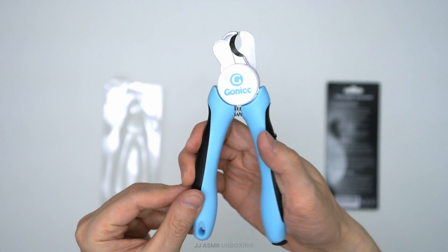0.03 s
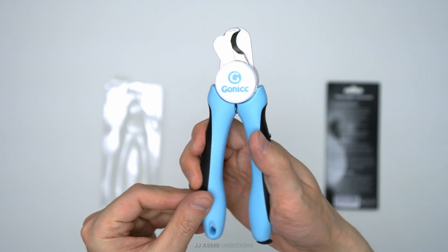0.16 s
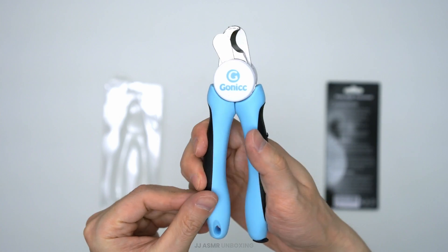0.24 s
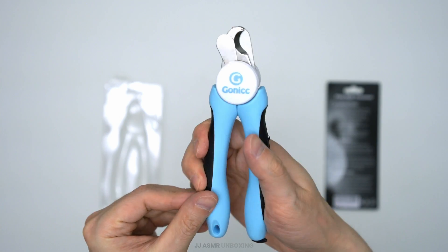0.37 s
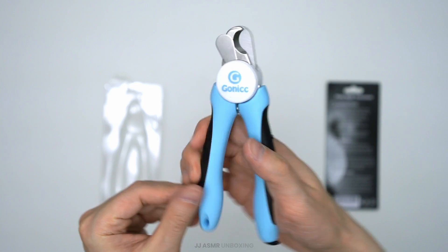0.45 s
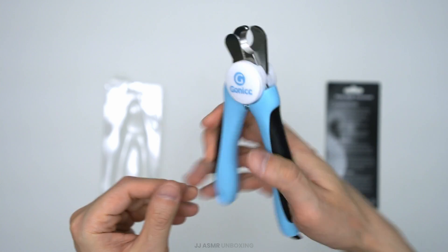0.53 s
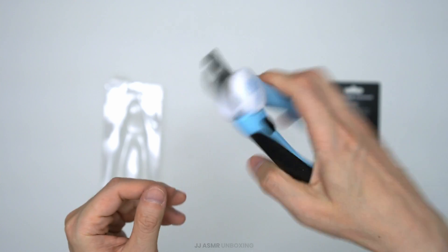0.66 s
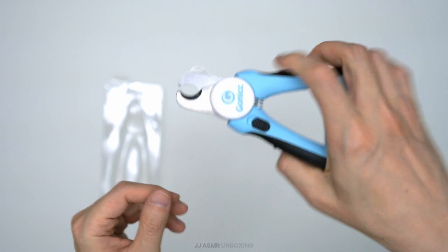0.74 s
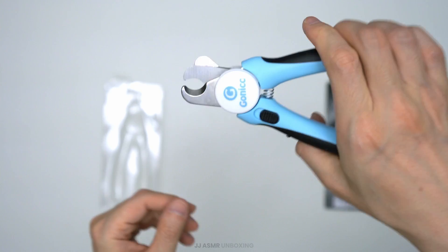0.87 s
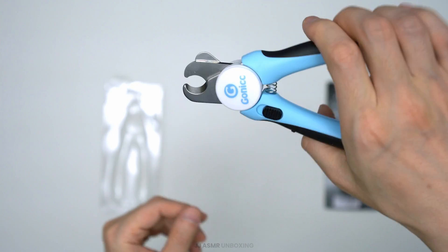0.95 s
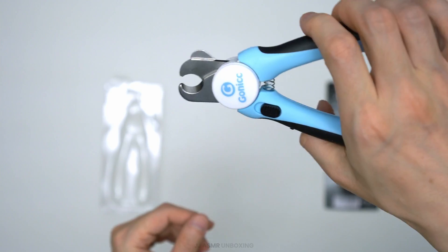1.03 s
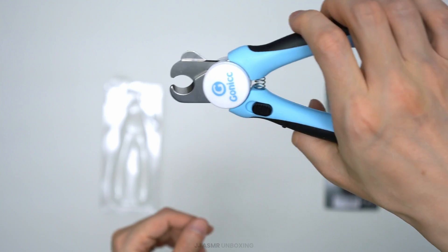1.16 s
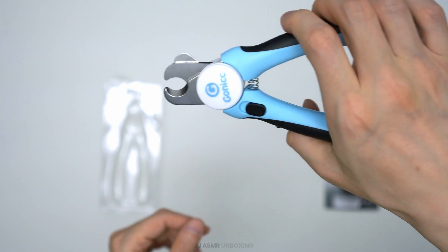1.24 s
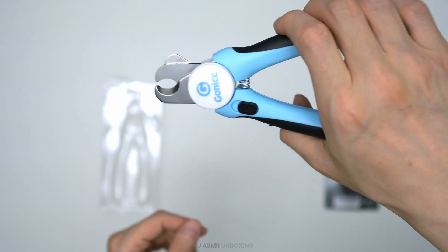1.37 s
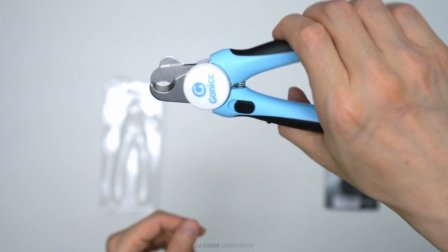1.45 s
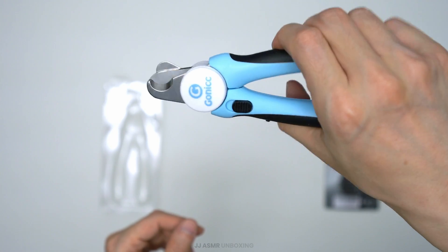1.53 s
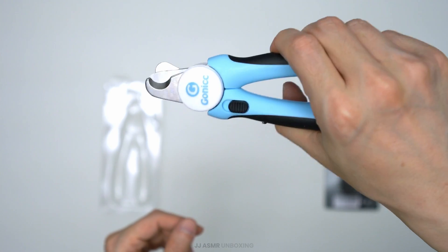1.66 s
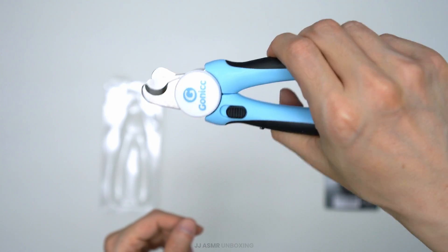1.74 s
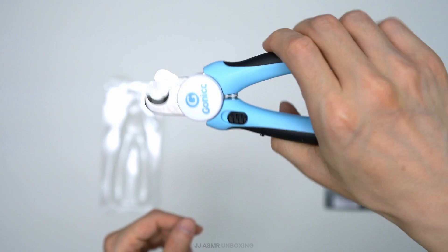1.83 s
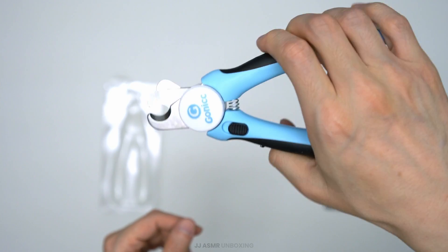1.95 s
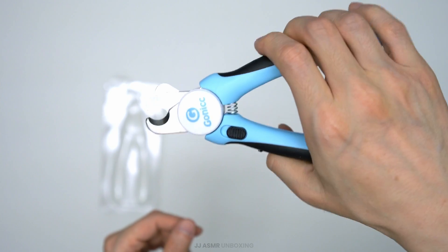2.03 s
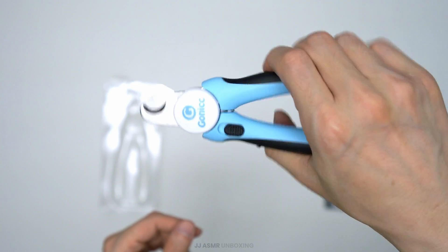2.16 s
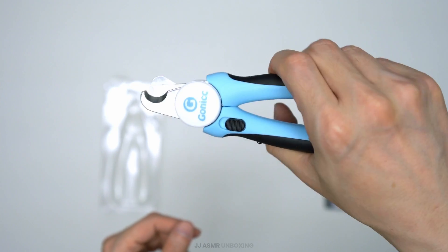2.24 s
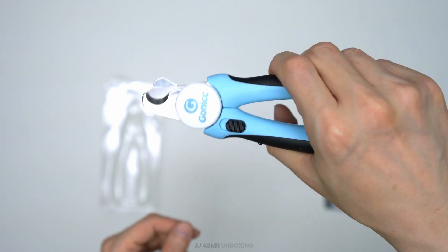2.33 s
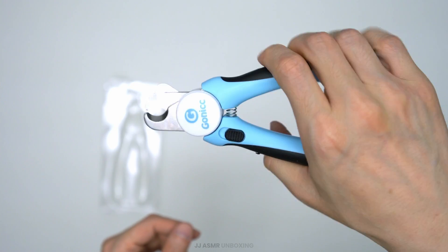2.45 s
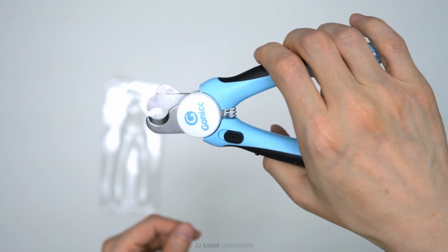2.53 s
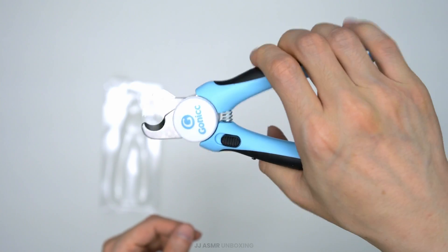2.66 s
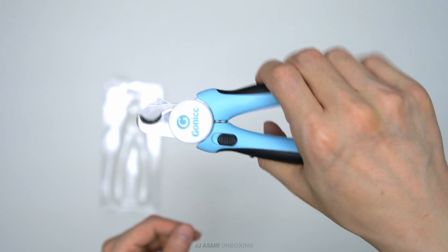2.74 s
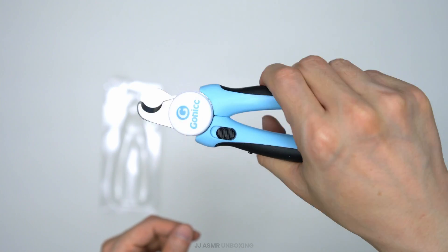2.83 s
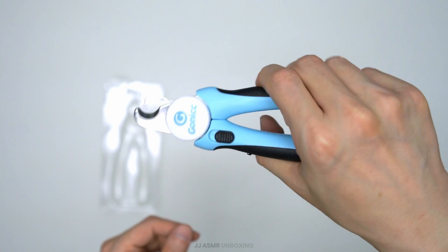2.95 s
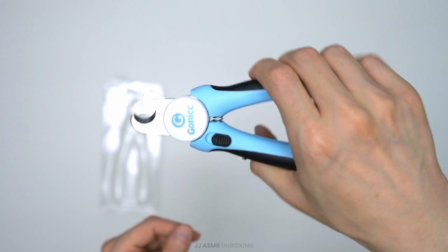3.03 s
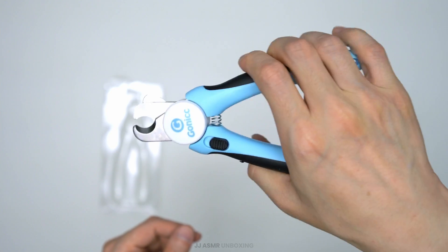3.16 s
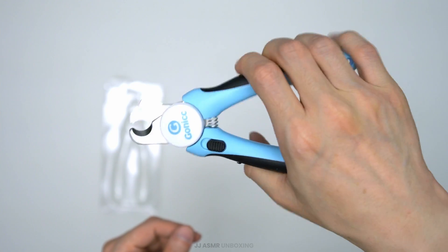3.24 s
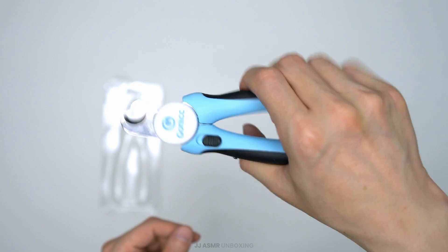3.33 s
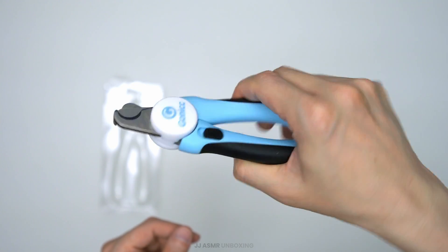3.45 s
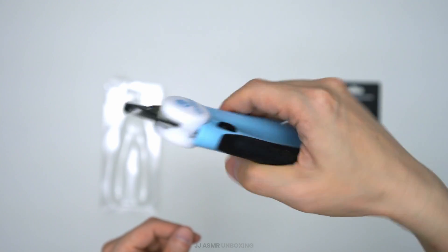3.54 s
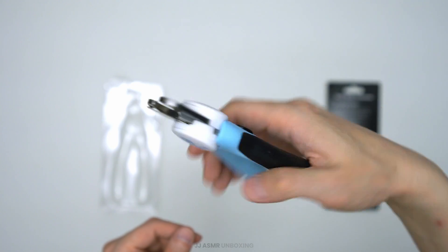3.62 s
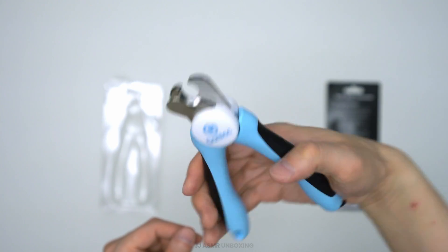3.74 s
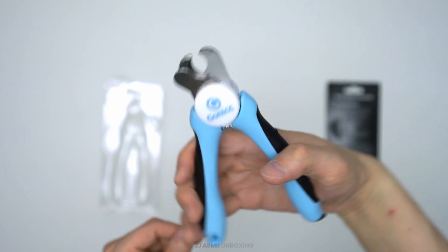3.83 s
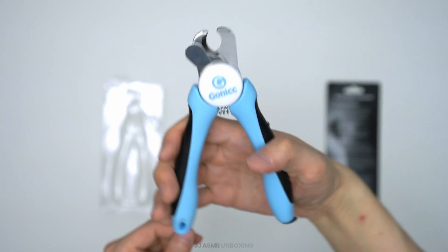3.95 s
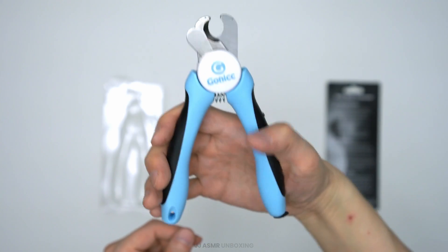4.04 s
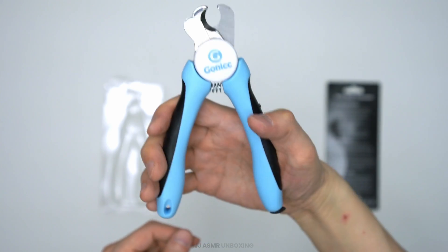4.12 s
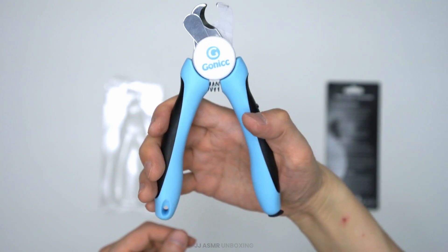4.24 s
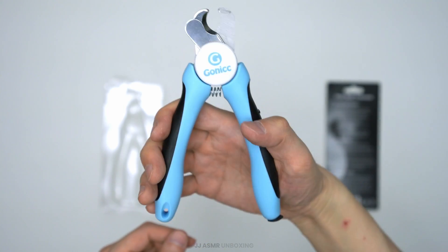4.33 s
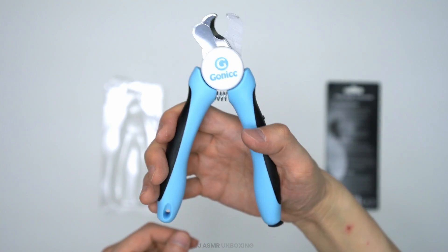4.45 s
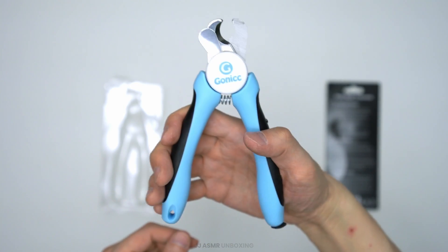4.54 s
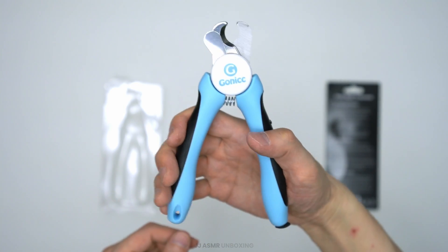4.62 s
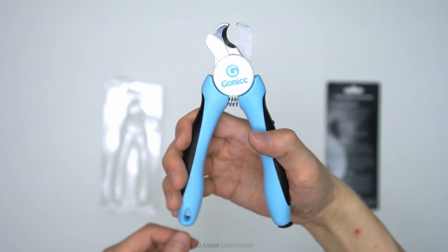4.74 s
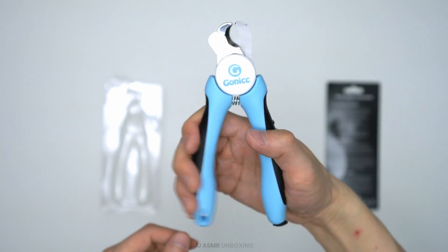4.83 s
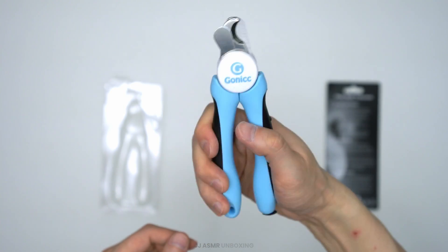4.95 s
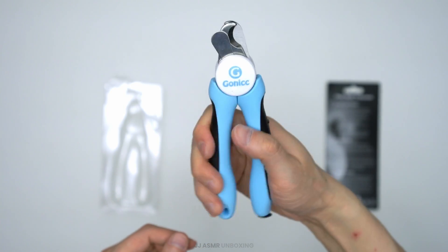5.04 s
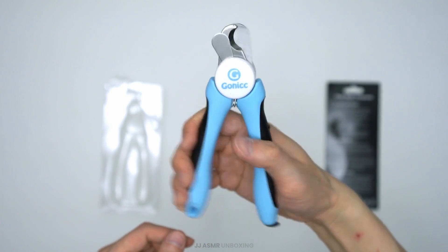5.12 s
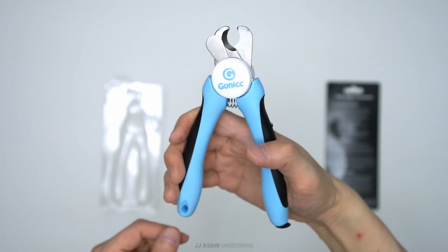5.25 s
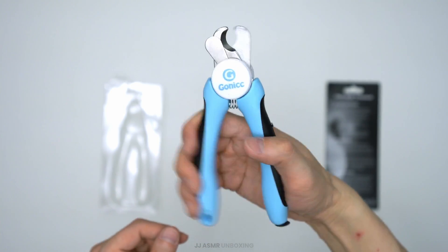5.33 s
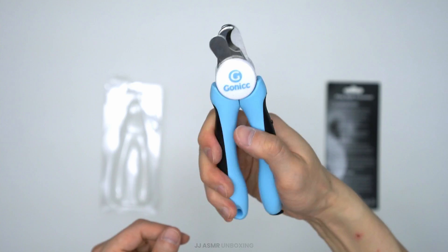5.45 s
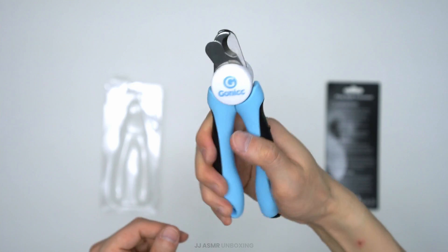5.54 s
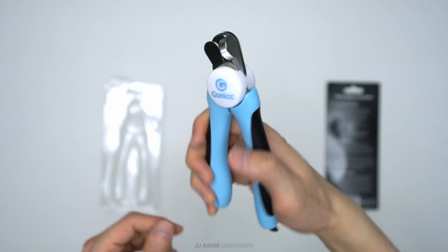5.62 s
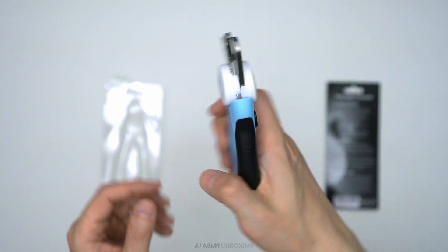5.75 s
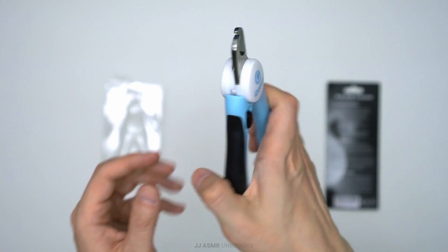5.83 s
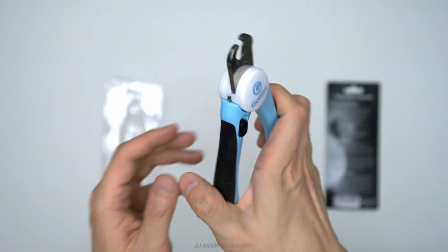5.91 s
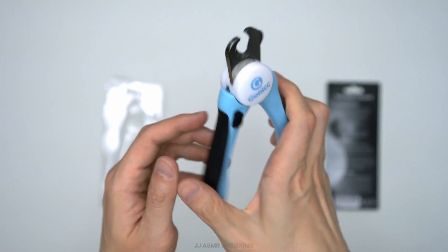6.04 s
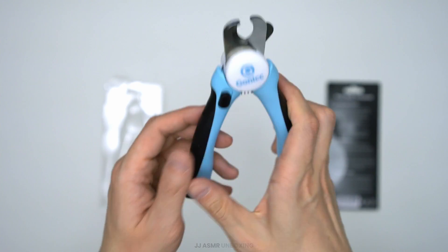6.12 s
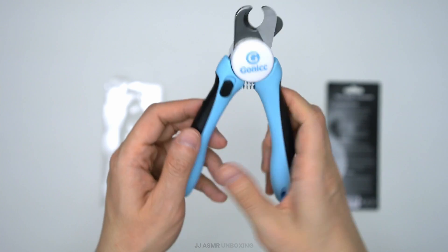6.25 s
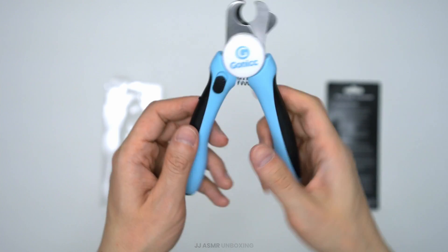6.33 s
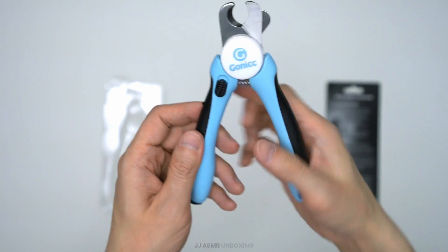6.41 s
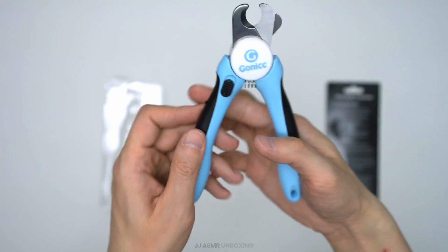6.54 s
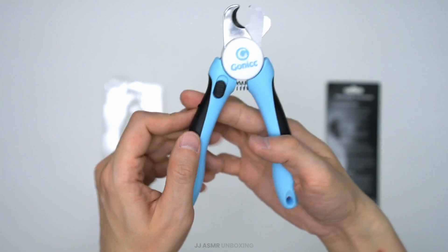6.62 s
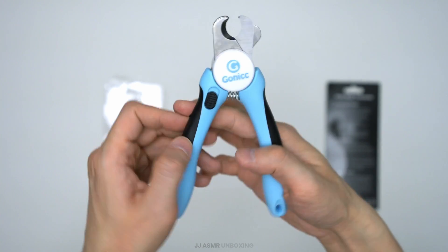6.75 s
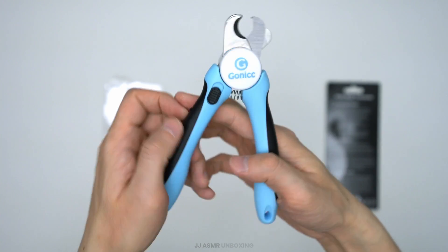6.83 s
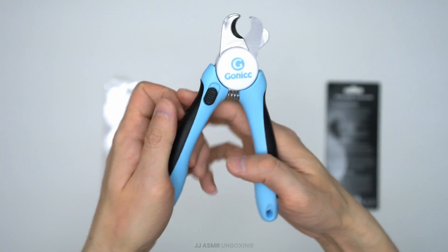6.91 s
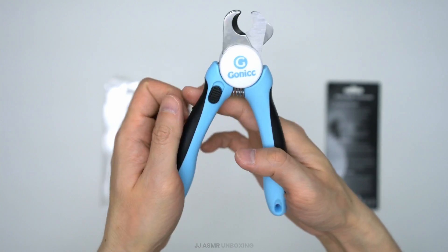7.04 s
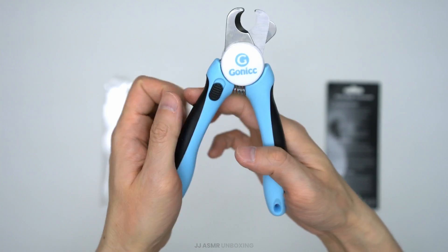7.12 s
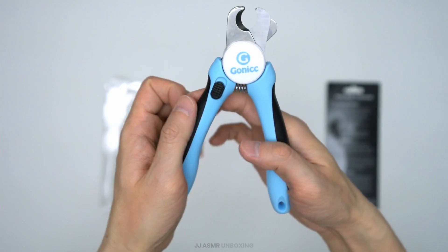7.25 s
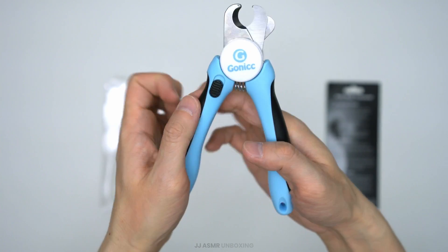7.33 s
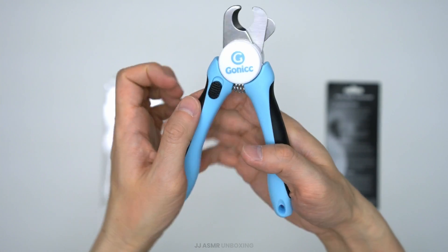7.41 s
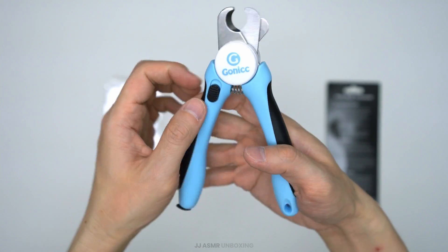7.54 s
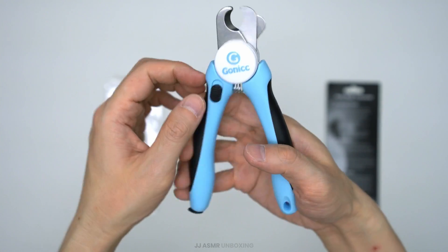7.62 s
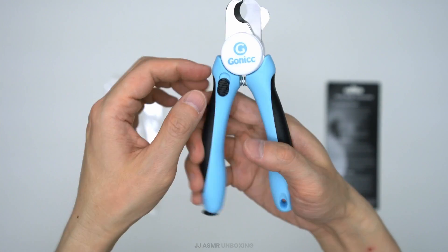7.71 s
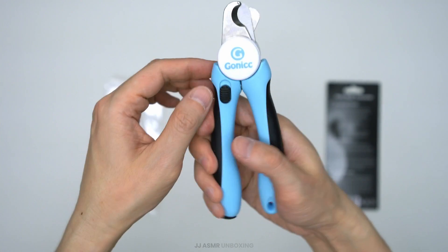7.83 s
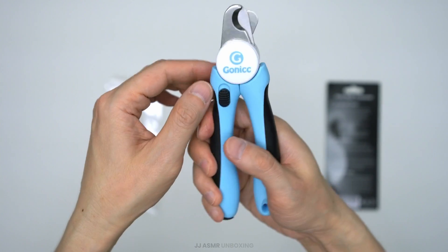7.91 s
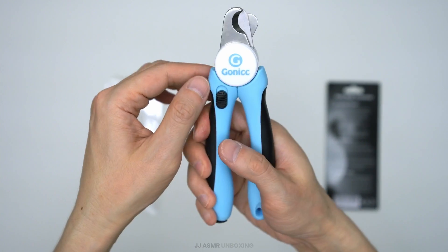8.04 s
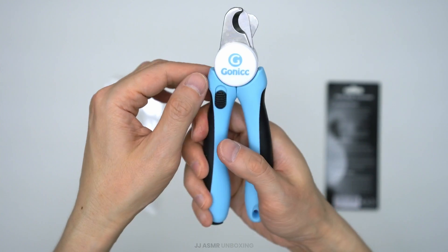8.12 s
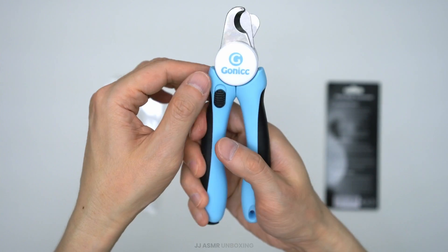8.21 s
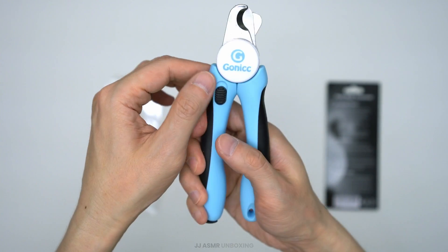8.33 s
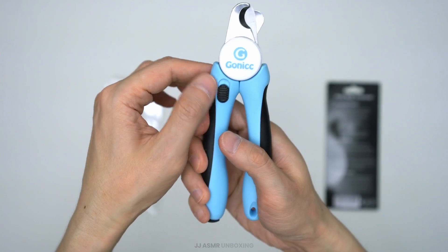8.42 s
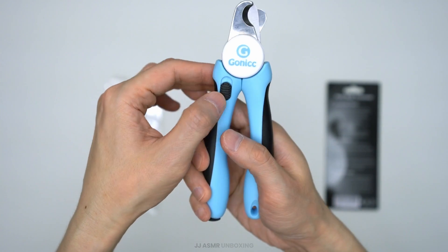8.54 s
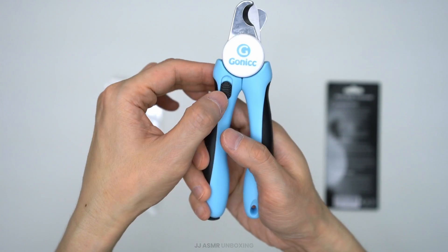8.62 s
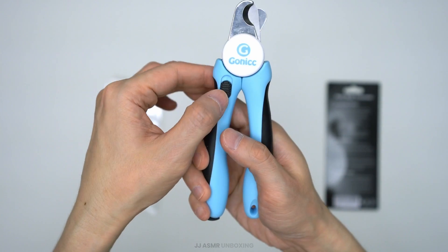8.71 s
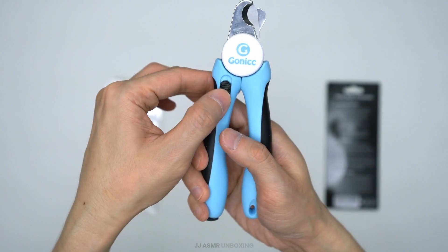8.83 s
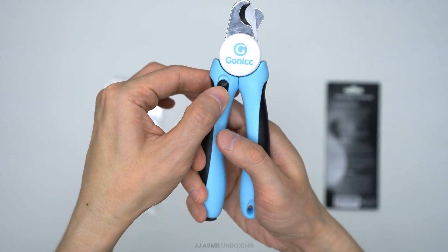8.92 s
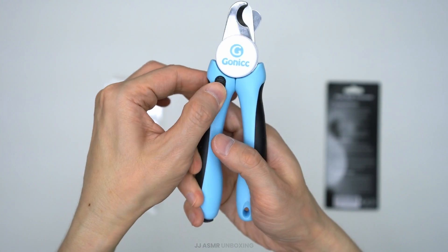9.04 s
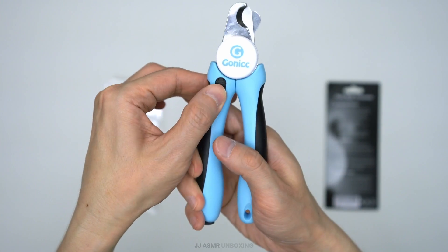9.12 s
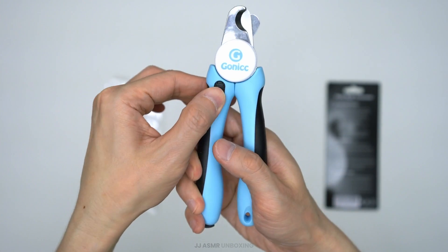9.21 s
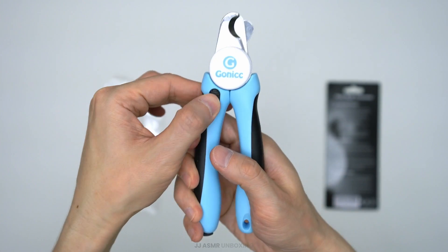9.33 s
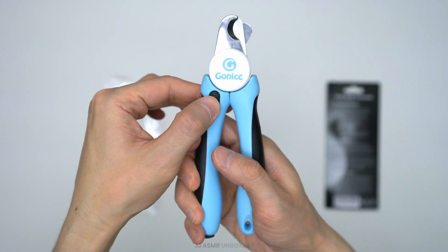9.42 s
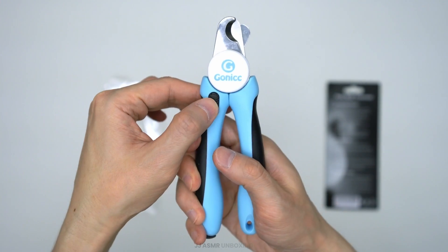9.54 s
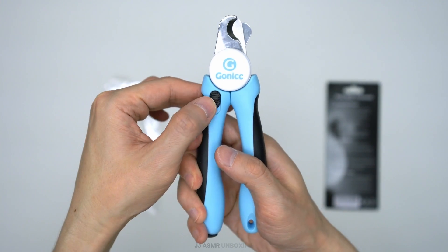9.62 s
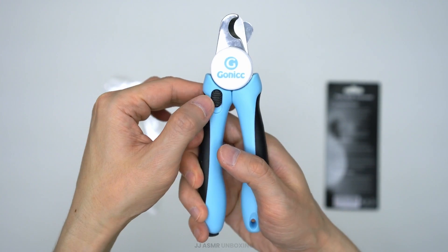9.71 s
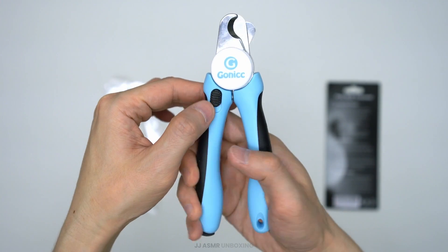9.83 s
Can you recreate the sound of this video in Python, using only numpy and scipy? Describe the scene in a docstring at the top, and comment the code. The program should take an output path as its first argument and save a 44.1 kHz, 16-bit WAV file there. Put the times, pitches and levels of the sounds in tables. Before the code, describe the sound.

A small quiet room with faint steady hiss, low rumble and barely audible hum; one close microphone, centred. Steel clippers begin with a slow squeeze at 0.1 s, a light touch and grainy scrape ending in a soft ringing click at 0.3, then a snap and open clack near 0.5-0.6. Squeezes close at about 1.6, 2.25, 2.8 and 3.4 s, each answered by a bright snap and dry clack about a quarter second later. Two firmer, faster cycles close at 5.0 and 5.45, releasing at 5.15 and, sharpest, 5.66. Palm rubs and finger brushes on plastic are soft, mainly around the early strokes and from 5.9 to 7.2. A slower squeeze scrapes shut at 7.8-7.9. After near silence, the lock slider snaps at 9.1, the loudest, crisp click with a short spring shiver and room tail. Tiny ticks follow at 9.6 and, more clearly, 9.85.

```python
"""In a small, quiet room, spring-loaded pet nail clippers are worked close to one microphone.
A squeeze: the steel blades touch, scrape past each other (grainy friction noise) and hit their stop
with a short ring (noise bursts and damped modes). A release: they snap free, scrape back and clack open.
Palm and fingers rub the handles, loose parts tick, and near the end the lock slider snaps home.
Hiss, rumble and a faint hum are coloured noise; the short contacts are followed by a room tail."""
import sys
import numpy as np
from scipy import signal
from scipy.fft import rfft, irfft, next_fast_len
from scipy.io import wavfile
from scipy.ndimage import uniform_filter1d

SR = 44100
rng = np.random.default_rng(int(sys.argv[2]) if len(sys.argv) > 2 else 0)


def log_audio(samples):
    """Write samples as a 16-bit WAV file to the path given in sys.argv[1]."""
    # one column per channel
    frames = np.atleast_2d(samples).T
    # limit to full scale, then quantise
    limited = np.clip(frames, -1, 1)
    pcm = np.round(limited * 32767).astype(np.int16)
    wavfile.write(sys.argv[1], SR, pcm)


N = 435266  # samples in the scene
HIT_SIZE = 16384  # samples in one short sound
T = np.arange(HIT_SIZE) / SR  # s
HZ = np.fft.rfftfreq(HIT_SIZE, 1 / SR)

# Squeezes, from the blades' first touch to the closed stop. Each row: touch in seconds, stop in seconds,
# touch level in dB, stop level in dB (both near the peak), extra spring sing in dB, extra treble edge in dB.
SQUEEZES = [(0.101, 0.283, -37.5, -27.5, 10.5, 4), (1.481, 1.61, -34.5, -25, 2.5, -2),
            (2.177, 2.249, -34, -22, -1, 1), (2.756, 2.83, -40, -22.5, -3, 0),
            (3.344, 3.4, -32.5, -21.5, -1.5, 2.5), (4.9137, 4.98, -31, -20.5, 2.5, 9),
            (5.412, 5.46, -30.5, -16.5, 3.5, 6), (7.7652, 7.92, -35.5, -22.5, -0.5, -7)]
# Releases, from the snap to the open stop. Each row: snap in seconds, stop in seconds,
# snap level in dB, stop level in dB (both near the peak), extra spring sing in dB, extra treble edge in dB.
RELEASES = [(0.497, 0.575, -33, -19, 0, 5), (1.825, 1.914, -24, -21, -4, 7),
            (2.437, 2.491, -15.5, -21, -4.5, -5), (3.058, 3.12, -18, -19.5, -6.5, -4),
            (3.596, 3.653, -14.5, -18.5, 1.5, 1.5), (5.15, 5.196, -13.5, -18.5, 8, 4.5),
            (5.662, 5.758, -9.5, -22, 8.5, 0)]
# The lock slider's snap. Each row: time in seconds, level near the peak in dB.
LOCK_SNAPS = [(9.078, -6)]
# Short-lived modes of the hinge and loose blades.
# Each row: frequency in Hz, mean relative level in dB, decay time t60 in seconds.
HINGE_MODES = [(3080, 2, 0.026), (3700, -32, 0.033), (4400, -5, 0.045), (4730, 5, 0.029), (5440, -3, 0.028),
               (5830, 1, 0.03), (6700, -5, .035)]
# Colour of the contact at the open stop. Each row: frequency in Hz, relative level in dB per Hz.
OPEN_TONE = [(290, -35), (500, -24), (974, -13.5), (2330, -14), (2930, -6.5), (3390, -5), (4940, 1.5),
             (6420, -3.5), (7210, -10), (7860, -10.5), (9920, -19), (11000, -21.5), (16000, -38)]


def amp(db):
    """The decibel is logarithmic: 20 dB is a factor of ten in amplitude."""
    return 10 ** (np.asarray(db) / 20)


def unit(x):
    """Equal mean power: scale to rms 1."""
    return x / np.sqrt(np.mean(x ** 2) + 1e-20)


def unit_peak(x):
    """Equal short-time power: scale so that the loudest 3 ms have rms 1."""
    power = uniform_filter1d(x ** 2, size=132, mode="constant")
    return x / np.sqrt(power.max())


def fade(t60, t=T):
    """Linear damping gives exponential decay: 60 dB in t60 seconds."""
    return amp(-60 * t / t60)


def along(points, hz):
    """Pitch is logarithmic: (Hz, value) points are interpolated on a log-frequency axis."""
    point_hz, value = np.transpose(points)
    return np.interp(np.log(hz + 1), np.log(point_hz + 1), value)


def noise(spectrum):
    """Linear filtering: white noise takes on the spectrum of the filter, here at rms 1."""
    size = next_fast_len(N + SR // 2)
    gain = amp(along(spectrum, np.fft.rfftfreq(size, 1 / SR)))
    white = rfft(rng.standard_normal(size))
    return unit(irfft(white * gain, size)[:N])


def causal(db):
    """Minimum phase: folding the cepstrum gives the causal response with these levels on the HZ grid."""
    cepstrum = irfft(np.log(np.maximum(amp(db - db.max()), 1e-4)))
    cepstrum[1:HIT_SIZE // 2] *= 2
    cepstrum[HIT_SIZE // 2 + 1:] = 0
    return np.exp(rfft(cepstrum))


def add(track, s, sound):
    """Superposition: mix a sound into the track at s seconds."""
    part = track[round(s * SR):][:len(sound)]
    part += sound[:len(part)]


def in_room(x, wet_db):
    """Reverberation: bounces off table and hand, then a fresh diffuse tail, follow the direct sound."""
    # Decay of the room. Each row: frequency in Hz, decay time t60 in seconds.
    room_decay = [(500, 0.37), (2500, 0.3), (6000, 0.29), (10000, 0.19), (15000, 0.18)]
    hz, t, z = signal.stft(rng.standard_normal(HIT_SIZE), SR, nperseg=256)
    decaying = z * fade(along(room_decay, hz)[:, None], t)
    tail = signal.istft(decaying, SR, nperseg=256)[1][:HIT_SIZE]
    tail *= 1 - np.exp(-T / 0.0023)
    bounces = rng.standard_normal(HIT_SIZE) * (T > .0012) * (T < .005)
    answer = amp(wet_db) * tail / np.linalg.norm(tail)
    answer += amp(-9.0) * bounces / np.linalg.norm(bounces)
    return x + signal.fftconvolve(x, answer)[:HIT_SIZE]


def contact(colour_db, chatter_s, spread_s):
    """Dispersion: hard parts chatter for a few ms; bending waves carry the treble out first."""
    burst = rng.standard_normal(HIT_SIZE) * fade(chatter_s, T ** 2 / chatter_s)  # Gaussian fade
    force = rfft(burst)
    # partly flatten the random burst's spectrum, so that the given colour sets the sound
    force /= np.abs(force) ** (2 / 3)
    delay = spread_s / np.sqrt(1 + HZ / 1000)  # group delay in seconds
    bending = np.exp(-2j * np.pi * np.cumsum(delay - delay[-1]) * HZ[1])
    wave = irfft(force * causal(colour_db) * bending)
    return unit_peak(wave * (T < T[-1] / 2))  # the late half may hold wrapped-round sound


def ring(modes, shade, length=1, lowest_db=0):
    """Modal superposition: damped steel modes; the grip scales their decay and the lowest one's level."""
    hz, db, t60 = np.transpose(modes)[:, :, None]
    level, phase = rng.standard_normal((2, len(modes), 1))
    shade_db = np.where(hz == hz.min(), lowest_db, along(shade, hz))
    db = db + 2.5 * level + shade_db  # each blow excites the modes a little differently
    waves = amp(db) * fade(t60 * length) * np.sin(2 * np.pi * (hz * T + phase))
    onset = 1 - np.exp(-T / 0.0014)
    return waves.sum(axis=0) * onset / np.linalg.norm(amp(db))


def spring(centre_hz, width_hz, t60):
    """Modal density: a coil spring's cluster of close modes shivers as fading narrow-band noise."""
    resonance = 1 / (1 + ((HZ - centre_hz) / width_hz) ** 2)
    cluster = irfft(rfft(rng.standard_normal(HIT_SIZE)) * resonance)
    return unit(cluster) * fade(t60)


def shading(knock_db=0, sing_db=0, edge_db=0):
    """Spectral balance, as (Hz, dB) against the usual blow: handles' knock, spring's sing, treble edge."""
    return [(1200, knock_db), (2400, 0), (4200, 0), (5300, sing_db), (6000, sing_db), (7000, 0),
            (9500, edge_db)]


def strokes(table, rise_s, fall_s):
    """Amplitude modulation: gain of strokes that swell, pass through their levels and stop."""
    gain, t = np.zeros(N), np.arange(SR) / SR
    for start, end, *levels_db in table:
        length = end - start
        gate = (1 - np.exp(-t / rise_s)) * np.exp(-np.maximum(t - length, 0) / fall_s)
        level_db = np.interp(t, np.linspace(0, length, len(levels_db)), levels_db)
        add(gain, start, gate * amp(level_db))
    return gain


def friction(tone, grain_rate, grain_db):
    """Surface roughness: grain_rate tiny bumps a second vary the rubbing noise by about grain_db."""
    knots = rng.standard_normal(N)
    bumps = np.interp(np.arange(N) * grain_rate / SR, np.arange(N), knots)
    return unit(noise(tone) * amp(grain_db * bumps))


def scrapes(table, levels_db, bite_share=0):
    """Friction grows with speed: the pivot creeps, then blades rub to the stop, louder when quicker."""
    usual_travel_s, speed_power = 0.064, 1.04  # scrape amplitude grows as this power of blade speed
    creep_s, creep_db = 0.033, -54.5  # faint rub just before each stroke, at the usual speed
    for start, stop, *_ in table:
        travel_s = stop - start
        speed_db = 20 * np.log10(usual_travel_s / travel_s)
        yield start - creep_s, start, creep_db + speed_db
        yield start + bite_share * travel_s, stop, *(np.array(levels_db) + speed_power * speed_db)


def background():
    """Stationary random noise: steady hiss, low room rumble and a faint, unsteady hum."""
    # Hiss of the room. Each row: frequency in Hz, relative level in dB per Hz.
    air_tone = [(180, -26), (300, 0), (385, -4), (592, -4.5), (633, -8.5), (1090, -3), (1360, -4),
                (1550, -3), (1680, -5), (3380, -9), (3730, -9.5), (5200, -10.5), (6670, -12),
                (15000, -15.5), (15800, -18)]
    # Rumble of the room. Each row: frequency in Hz, relative level in dB per Hz.
    rumble_tone = [(8.8, -24), (15, -0.5), (33, -2), (70, -5.5), (91, -4), (108, 0.5), (149, -7),
                   (172, -4.5), (202, -6), (236, -7), (340, -16), (440, -37), (750, -120)]
    hum = noise([(85, -80), (97, -19), (102, 4), (107, -22), (125, -73)])
    return amp(-57) * noise(air_tone) + amp(-60) * noise(rumble_tone) + amp(-76.5) * hum


def brushing():
    """Sliding friction: fingertips brush the plastic and fade as they slow."""
    # Brushes. Each row: start in seconds, length in seconds, starting level in dB.
    brush_times = [(0.754, 0.044, -47.5), (5.865, 0.048, -48), (6.065, .2, -52), (6.34, 0.062, -52.5),
                   (6.847, 0.31, -60), (7.615, .07, -48.5)]
    # Colour of finger on plastic. Each row: frequency in Hz, relative level in dB per Hz.
    brush_tone = [(1500, -9), (3500, -0.5), (5800, 3), (8000, -5), (15000, -10)]
    slowing_db = 9
    brushes = [(s, s + length, db, db - slowing_db) for s, length, db in brush_times]
    gain = strokes(brushes, rise_s=0.02, fall_s=0.025)
    return gain * friction(brush_tone, grain_rate=250, grain_db=-2.5)


def gripping():
    """Sliding friction on a hollow body: the palm rubs the handles, swelling toward mid-rub."""
    # Rubs. Each row: start in seconds, length in seconds, level at the middle in dB.
    grip_times = [(0.383, 0.32, -53), (1.098, .28, -60), (2.15, 0.058, -60), (3.32, 0.13, -52.5),
                  (3.61, 0.12, -53)]
    # Colour of palm on handle. Each row: frequency in Hz, relative level in dB per Hz.
    grip_tone = [(280, -16), (340, -2.5), (470, -15), (620, 0), (700, -0.5), (790, -2), (920, -3),
                 (1500, -10), (3000, -37)]
    swell_db = 6.5
    rubs = [(s, s + length, db - swell_db, db, db - swell_db) for s, length, db in grip_times]
    gain = strokes(rubs, rise_s=0.0064, fall_s=0.071)
    return gain * friction(grip_tone, grain_rate=90, grain_db=3.5)


def scraping():
    """Sliding friction: blade rubs on blade."""
    # Scrape of a usual squeeze: levels in dB at its start, middle and end.
    closing_db = (-40.5, -45, -49.5)
    # Scrape of a usual release: levels in dB at its start, middle and end.
    opening_db = (-37.5, -47.5, -49.5)
    # Colour of the scrape. Each row: frequency in Hz, relative level in dB per Hz.
    scrape_tone = [(800, -11.5), (1500, -6), (1950, -1.5), (2280, 1.5), (2700, -5), (3200, 0.5), (4000, -1),
                   (4900, -1), (5650, 4.5), (6400, -1.5), (7500, -5), (10000, -14.5), (12500, -12),
                   (15500, -32)]
    bursts = [*scrapes(SQUEEZES, closing_db, bite_share=0.11)]  # share passed before the edges rub
    bursts += scrapes(RELEASES, opening_db)
    # a short, soft noise of the same colour is heard just before the lock snap
    bursts += [(s - 0.0097, s, -33.5) for s, _ in LOCK_SNAPS]
    gain = strokes(bursts, rise_s=0.014, fall_s=0.013)
    return gain * friction(scrape_tone, grain_rate=600, grain_db=2.0)


def ticking():
    """Light impact: blades and loose parts touch, a little thinner than the clack."""
    # Ticks of loose parts. Each row: time in seconds, level near the peak in dB.
    loose_ticks = [(0.6215, -32), (6.4847, -42.5), (9.6106, -44), (9.8488, -26)]
    track = np.zeros(N)
    shade = [(900, -3), (2500, 8.5), (4500, -4), (10000, 8.0)]
    colour = along(OPEN_TONE, HZ) + along(shade, HZ)
    first_touches = [(s, db) for s, _, db, *_ in SQUEEZES]
    for s, db in first_touches + list(loose_ticks):
        touch = contact(colour, chatter_s=0.0099, spread_s=0.00104)
        add(track, s, amp(db - 10.5) * in_room(touch, wet_db=-8.5))
    return track


def locking():
    """Impact and resonance: the slider jumps its detent, rebounds once, and the squeezed spring sings on."""
    # The slider's resonances. Each row: frequency in Hz, width in Hz, relative level in dB.
    slider_modes = [(2450, 270, -16), (4050, 970, -10), (4800, 420, -7.5), (5370, 480, -1.5),
                    (5860, 640, -0.5), (6690, 210, -6), (7790, 530, -7.5), (9150, 600, -8),
                    (10220, 650, -8), (11500, 600, -15), (12550, 1300, -16)]
    track = np.zeros(N)
    power = sum(amp(db) ** 2 / (1 + (2 * (HZ - hz) / width) ** 2) ** 2 for hz, width, db in slider_modes)
    body = along([(200, -34), (700, -50), (1300, -23), (4500, -27.0), (8500, -17), (13000, -20),
                  (16000, -38)], HZ)
    colour = 10 * np.log10(power + amp(body) ** 2)
    for s, db in LOCK_SNAPS:
        snap = amp(-5.5) * contact(colour, chatter_s=0.0026, spread_s=0.00303)
        rebound = amp(-31) * contact(along(OPEN_TONE, HZ), chatter_s=0.0029, spread_s=0.00296)
        add(snap, .002, rebound)
        shiver = amp(-25.5) * spring(centre_hz=5570, width_hz=280, t60=0.23)
        add(track, s, amp(db) * (in_room(snap, wet_db=-13.5) + shiver))
    return track


def opening():
    """Hard impact: the spring throws the handles on the open stop with a dry, slightly metallic clack."""
    track = np.zeros(N)
    for _, s, _, db, _, _ in RELEASES:
        # the open stop is hard and settles quickly
        hit = amp(-9.0) * contact(along(OPEN_TONE, HZ), chatter_s=0.004, spread_s=0.00089)
        hit += amp(-16) * ring(HINGE_MODES, shading())
        add(track, s, amp(db) * in_room(hit, wet_db=-12.0))
    return track


def releasing():
    """Static friction lets go in a bright snap that shakes hinge and spring."""
    # Colour of the snap. Each row: frequency in Hz, relative level in dB per Hz.
    release_tone = [(530, -38), (900, -34), (2540, -18.5), (3430, -11.5), (4010, -2), (4520, -17),
                    (5040, 1), (5350, -2), (5890, -3.5), (6970, -19.5), (7580, -13), (8450, -18.5),
                    (9310, -13), (12700, -15.5), (16000, -30)]
    track = np.zeros(N)
    for s, _, db, _, sing_db, edge_db in RELEASES:
        shade = shading(sing_db=sing_db, edge_db=edge_db)
        colour = along(release_tone, HZ) + along(shade, HZ)
        hit = amp(-10.5) * contact(colour, chatter_s=0.006, spread_s=0.00205)
        hit += amp(-14.5) * ring(HINGE_MODES, shade)
        shiver = amp(-40 + sing_db) * spring(centre_hz=5700, width_hz=300, t60=0.19)
        add(track, s, amp(db) * (in_room(hit, wet_db=-14.5) + shiver))
    return track


def shutting():
    """Impact excites damped modes: the blades hit their stop and ring, damped by the hand."""
    # Blade modes. Each row: frequency in Hz, mean relative level in dB, free decay time t60 in seconds.
    blade_modes = [(1520, -5.5, 0.18), (1970, -19, 0.04), (2523, 6.5, 0.096), (2730, -6, 0.25),
                   (3082, 4, 0.063), (3510, -11.5, 0.19), (3590, -14.5, 0.31), (3775, -12.5, 0.31),
                   (3820, -21, 0.12), (4083, -21, 0.23), (4230, -19, 0.16), (5322, -5.5, 0.19),
                   (6480, -4, 0.053), (10050, -19, 0.023)]
    # Colour of the blow. Each row: frequency in Hz, relative level in dB per Hz.
    shut_tone = [(350, -63), (600, -26), (1100, -3.5), (1990, -5), (2570, 3.5), (3190, -5), (3550, -6),
                 (4340, -7), (5250, -4), (5770, -6.5), (6420, 0), (7650, -24), (10300, -8), (11600, -27),
                 (15000, -35)]
    usual_stop_db, knock_per_db = -21.5, 1.7  # a harder squeeze knocks deeper (dB per dB)
    ring_share, damping_per_db = 0.76, 0.14  # free ring time left by the grip; dB of it lost per dB of force
    sideways_from_s, sideways_to_s = 0.7, 3.7  # the clippers are held sideways between these times
    sideways_db, upright_db = 3.5, -3  # how strongly the lowest blade mode radiates in each pose
    track = np.zeros(N)
    for _, s, _, db, sing_db, edge_db in SQUEEZES:
        force_db = db - usual_stop_db
        shade = shading(knock_per_db * force_db, sing_db, edge_db)
        length = ring_share * amp(-damping_per_db * force_db)
        lowest_db = sideways_db if sideways_from_s < s < sideways_to_s else upright_db
        colour = along(shut_tone, HZ) + along(shade, HZ)
        hit = amp(-12.5) * contact(colour, chatter_s=0.013, spread_s=0.001024)
        steel = amp(-3.5) * ring(blade_modes, shade, length, lowest_db)
        add(track, s, amp(db) * (in_room(hit, wet_db=-9.0) + steel))
    return track


def scene():
    """Superposition at one microphone, which feeds both channels."""
    mono = background() + brushing() + gripping() + scraping()
    mono += ticking() + locking() + opening() + releasing() + shutting()
    return np.array([mono, mono])


def record(dry):
    """Saturation and band limiting: the input rounds off the highest peaks and cuts steeply at top_hz."""
    top_hz = 15900
    rounded = dry / (1 + (dry / .78) ** 6) ** (1 / 6)
    size = next_fast_len(N + SR // 2)
    hz = np.fft.rfftfreq(size, 1 / SR)
    return irfft(rfft(rounded, size) / (1 + (hz / top_hz) ** 160), size)[:, :N]


dry = scene()
out = record(dry)
log_audio(out)
```